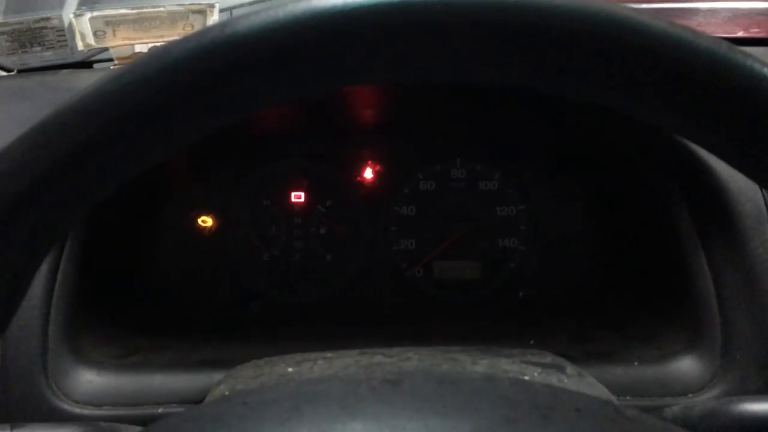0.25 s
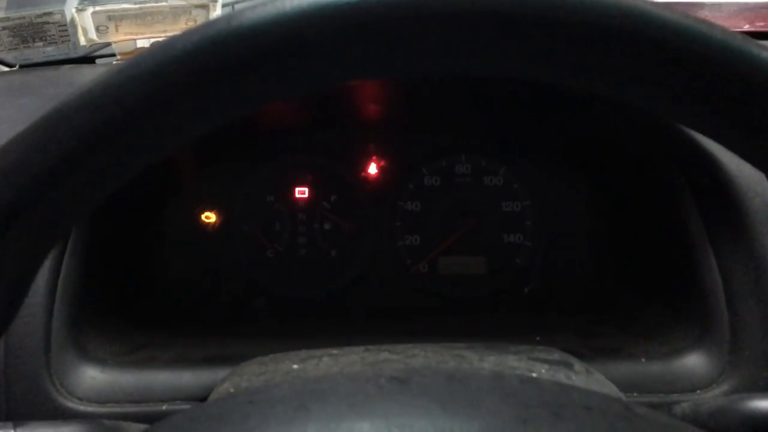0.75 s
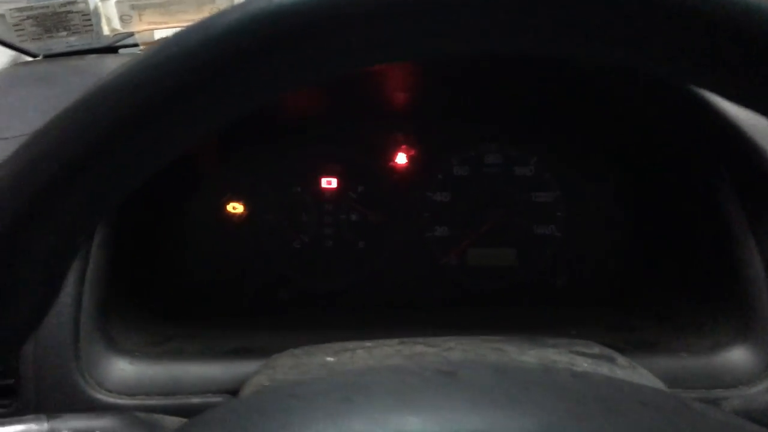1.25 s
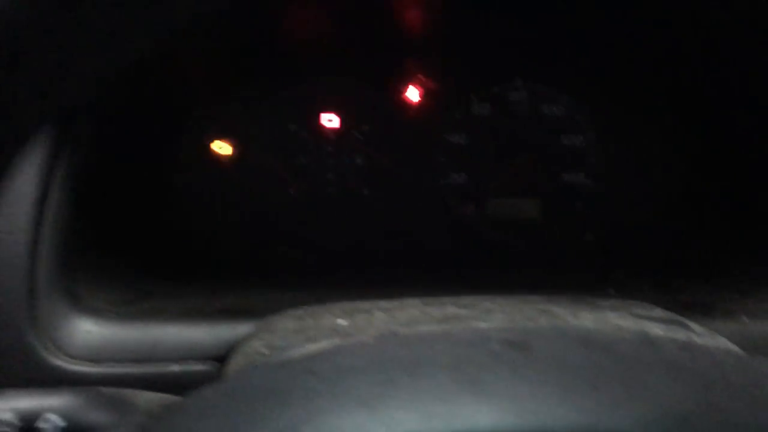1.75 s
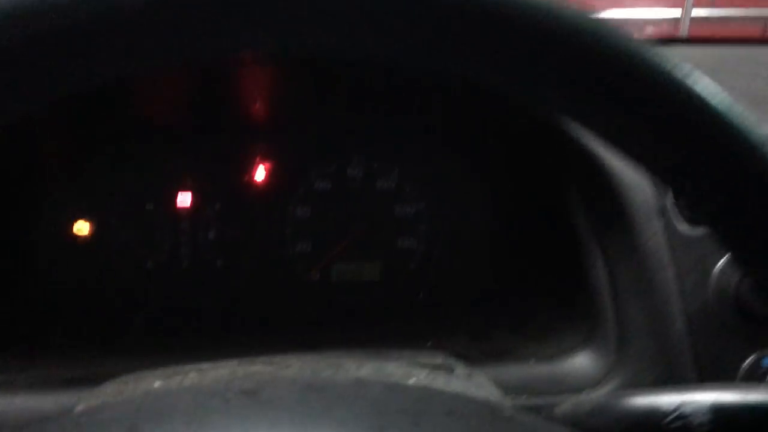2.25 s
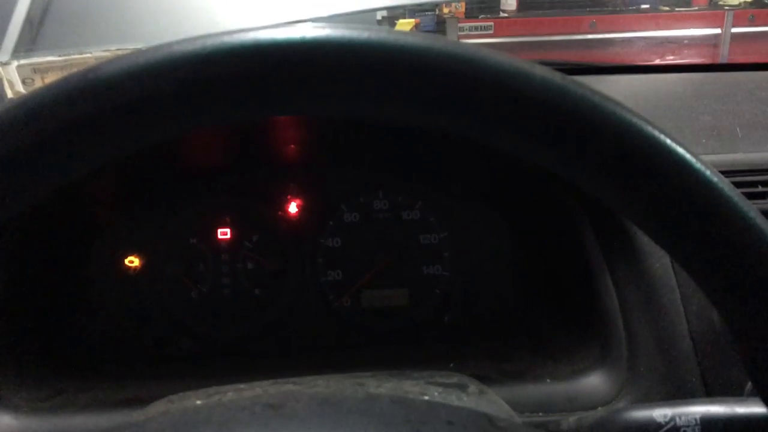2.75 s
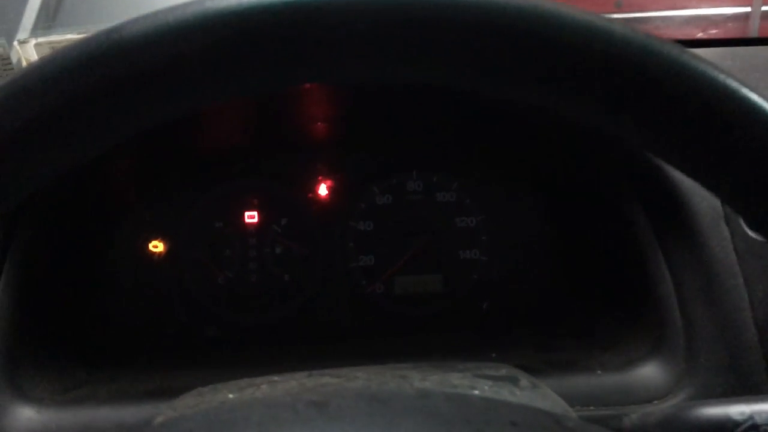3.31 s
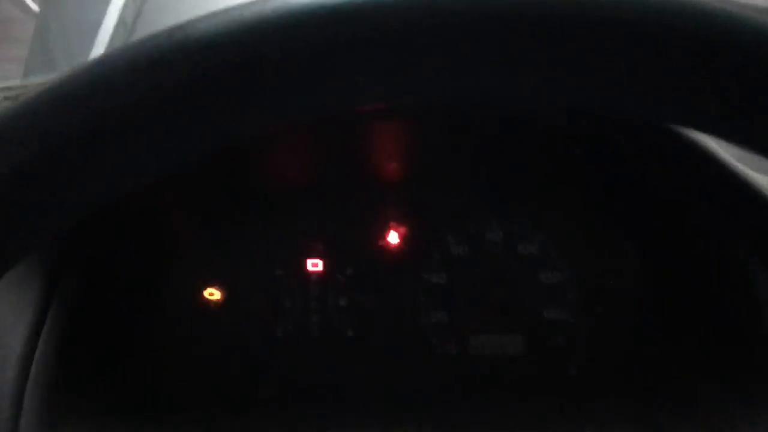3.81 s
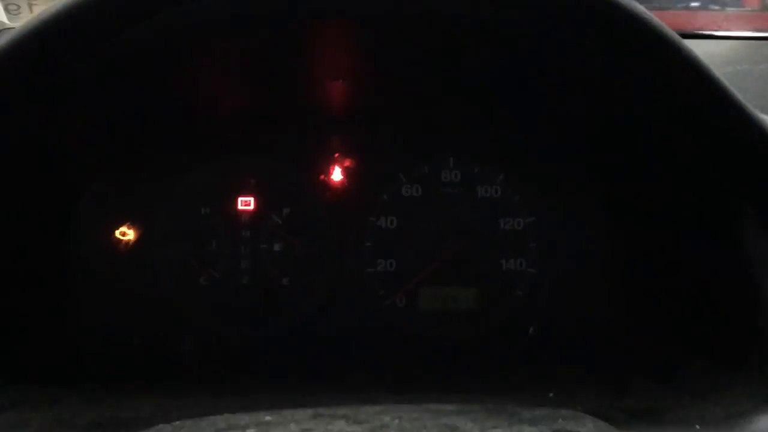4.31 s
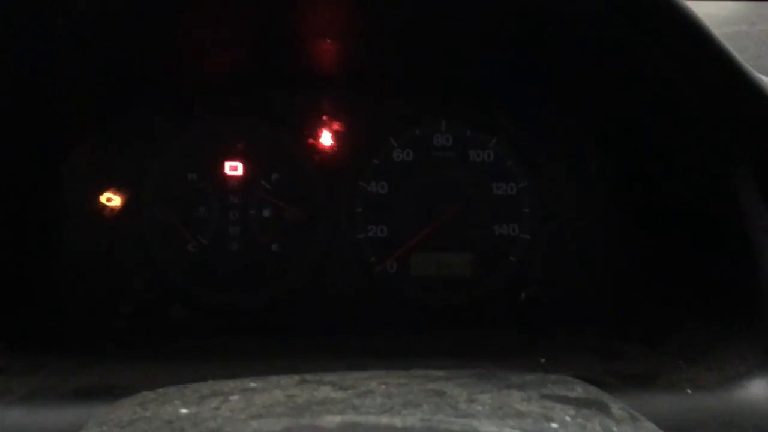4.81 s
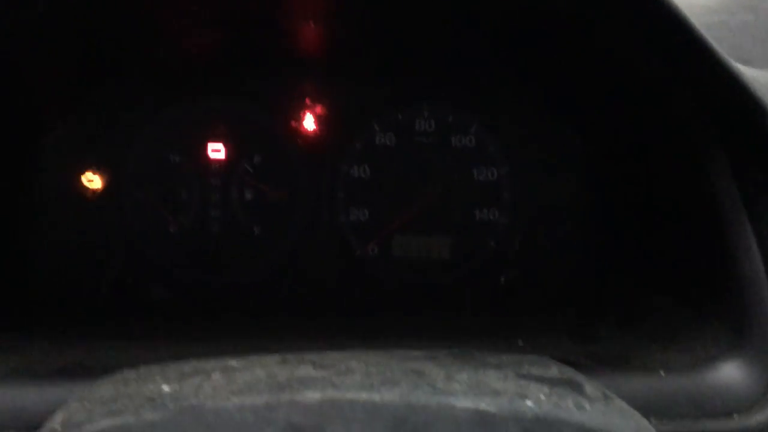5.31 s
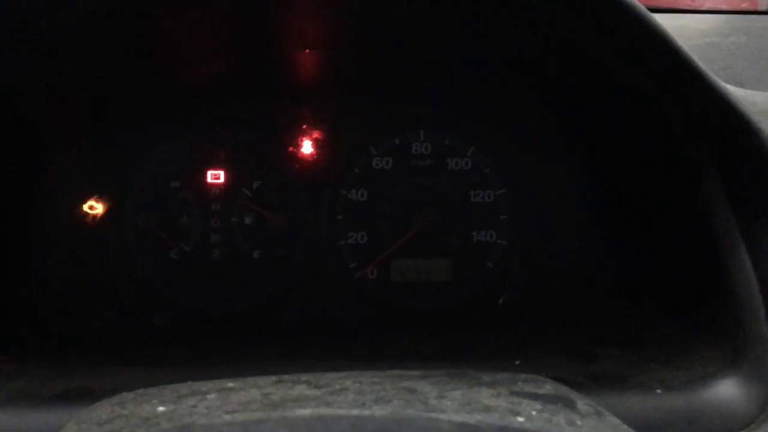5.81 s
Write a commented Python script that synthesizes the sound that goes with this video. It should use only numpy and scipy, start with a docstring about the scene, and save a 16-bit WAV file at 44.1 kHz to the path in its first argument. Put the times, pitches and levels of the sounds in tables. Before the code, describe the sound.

Inside a parked car, a four-cylinder engine idles unevenly with a low throb, buzzing panels, rattling metal and thin hiss, slowing very slightly.

```python
"""Repair shop, driver's seat of a small four-cylinder car: the engine idles roughly, its speed hunting.
Each firing thumps through the body shell as a sum of sines and sets dash panels buzzing near resonance.
A loose shield and the valve gear rattle as trains of contacts ringing in metal; air hisses as coloured noise.
Belt-driven parts hum and whine at multiples of the firing rate, over a low rumble of noise.
The hand-held microphone swings towards the dash twice, changing the balance of the sources."""
import sys
import numpy as np
from scipy import signal
from scipy.fft import rfft, irfft, next_fast_len
from scipy.io import wavfile

SR = 44100
rng = np.random.default_rng(int(sys.argv[2]) if len(sys.argv) > 2 else 0)


def persist_wave(psi):
    """Save psi, clipped to +-1, as 16-bit WAV."""
    counts = np.round(np.clip(psi, -1, 1) * 32767).astype(np.int16)
    wavfile.write(sys.argv[1], SR, np.atleast_2d(counts).T)


N = 267246  # samples
TIME = np.arange(N) / SR  # s

# ringing covers and brackets of the engine bay: centre_hz, width_hz, lift_db
BAY_RESONANCES = [(1610, 50, 4.5), (2713, 24, 10), (3230, 126, 6), (4360, 130, 3), (4580, 100, 5),
                  (4780, 71, 3), (12400, 440, 4.5)]


def from_db(db):
    """Decibels to gain."""
    return 10 ** (np.asarray(db) / 20)


def rms_one(x):
    """Scale to unit power."""
    return x / np.sqrt(np.mean(x ** 2) + 1e-20)


def in_time(rows):
    """Each column of a curve table, interpolated at every sample."""
    s, *columns = np.transpose(rows)
    return [np.interp(TIME, s, column) for column in columns]


def drift(rate_hz):
    """Slow chance of spread 1: noise through a double one-pole low-pass, drawn every 40 samples."""
    step, settling = 40, 2000
    pole = np.exp(-2 * np.pi * step * abs(rate_hz) / SR)
    noise = rng.standard_normal(N // step + settling + 2)
    slow = signal.lfilter([1], [1, -2 * pole, pole * pole], noise)[settling:]
    return np.interp(np.arange(N) / step, np.arange(len(slow)), rms_one(slow))


def coloured(x, spectrum, modes=()):
    """Pass a sound through a broad colour with resonances on top; rms 1."""
    size = next_fast_len(N)
    hz = np.maximum(np.arange(size // 2 + 1) * SR / size, 1)
    points = np.array(spectrum)
    db = np.interp(np.log(hz), np.log(points[:, 0]), points[:, 1])
    for centre_hz, width_hz, lift_db in modes:
        db = db + lift_db / (1 + (2 * (hz - centre_hz) / width_hz) ** 2)
    return rms_one(irfft(rfft(x, size) * from_db(db), size)[:N])


def tone(cycles):
    """A sine of rms 1 that peaks at every whole cycle."""
    return np.sqrt(2) * np.cos(2 * np.pi * cycles)


def orders(firings, rows, waver_db, slip, hunting):
    """Tones tied to the crank, swelling or fading with time; speed jitter blurs the high ones most."""
    out = 0
    for order, first_db, last_db in rows:
        db = np.linspace(first_db, last_db, N) + waver_db * drift(5.5)
        jittered = firings + hunting * drift(8.4)
        cycles = order * jittered + rng.random() + slip * drift(2.2)
        out = out + from_db(db) * tone(cycles)
    return out


def strike_train(firings, count, pattern_db, chance_db, scatter_s):
    """So many contacts a firing, recurring every four firings, each at its own crank angle and strength."""
    per_cycle = 4 * count
    cycles = np.arange(int(firings[-1] / 4) + 1)[:, None]
    places = (np.arange(per_cycle) + rng.random(per_cycle)) / per_cycle
    angles = 4 * (cycles + places)
    when = np.interp(angles, firings, TIME, left=-1, right=-1)
    when = when + scatter_s * rng.standard_normal(angles.shape)
    # a fixed pattern per engine cycle, plus chance at every contact
    pattern = pattern_db * rng.standard_normal(per_cycle)
    sizes = from_db(pattern + chance_db * rng.standard_normal(angles.shape))
    sizes = sizes * rng.choice([-1, 1], per_cycle)
    heard = (when >= 0) & (when < TIME[-1])
    return np.bincount((when[heard] * SR).astype(int), sizes[heard], N)


def thump(firings, sag, reach):
    """One rounded pressure pulse per firing, uneven in strength and timing, harder as the engine labours."""
    # harmonics of the pressure pulse: multiple_of_firing_rate, relative_db
    pulse_harmonics = [(1, 0), (2, -6.5), (3, -10)]
    idle_db, sag_db, swing_db = -32, 5, 1.0  # at nominal idle; per firing/s lost; at full reach
    uneven_db, uneven_firings = 0.42, .004
    angle = firings + uneven_firings * drift(16)
    pulse = sum(from_db(db) * tone(round(order) * angle) for order, db in pulse_harmonics)
    return pulse * from_db(uneven_db * drift(13) + idle_db + sag_db * sag + swing_db * reach)


def panels(firings, speed, flutter_db=0.5):
    """Dash panels answer half a firing late, loudest when an engine order meets their resonance."""
    # buzzing dash panels: multiple_of_firing_rate, resonance_hz, width_hz, level_on_resonance_db
    panel_resonances = [(7, 291.8, 6.9, -50), (8, 330.8, 2.8, -52.0)]
    buzz = 0
    for order, hz, width_hz, db in panel_resonances:
        detuning = 2 * (round(order) * speed - hz) / width_hz
        response = from_db(db) / (1 + .5 * detuning ** 2)
        buzz = buzz + response * tone(round(order) * (firings - .5))
    return buzz * from_db(flutter_db * drift(5.4))


def body_shell(firings):
    """Unequal cylinders shake the shell at many faint wavering orders, locked to quarters of the firing rate."""
    # weaker body vibration: multiple_of_firing_rate (before rounding to quarters), first_db, last_db
    shell_orders = [(4, -61, -73), (4.5, -69, -75), (4.75, -62, -60), (5, -61.5, -57.5), (5.25, -64.5, -67),
                    (7.5, -65, -77), (9.5, -60.5, -67.5), (10, -64.5, -70), (12, -62, -66),
                    (12.5, -68, -65.5), (14, -61, -74), (18.25, -74, -62), (21.85, -63.5, -65.5)]
    locked = [(np.round(4 * order) / 4, first_db, last_db) for order, first_db, last_db in shell_orders]
    return orders(firings, locked, waver_db=2.0, slip=0.035, hunting=0.002)


def shield(firings, reach, swing_db=2):
    """Thin loose sheet metal chatters under the firings and rings in a few narrow modes."""
    # buzz of the shield before the swings, mostly weaker as the engine slows: time_s, level_db
    shield_level = [(0, -50.5), (0.7, -54), (1.5, -53.5), (2.1, -53), (3, -53), (4, -57), (5, -75),
                    (6.06, -64)]
    # ringing of the sheet: centre_hz, width_hz, relative_db
    sheet_modes = [(1316, 43, -4), (1470, 150, 1.5), (2328, 95, -0.5)]
    out = 0
    for hz, width_hz, db in sheet_modes:
        chatter = strike_train(firings, count=6, pattern_db=2.0, chance_db=-2.5, scatter_s=.0004)
        ringing = signal.lfilter(*signal.iirpeak(hz, hz / width_hz, fs=SR), chatter + 1e-18)
        out = out + from_db(db) * rms_one(ringing)
    return from_db(in_time(shield_level)[0] + swing_db * reach) * rms_one(out)


def valve_gear(firings, ring_t60_s=.1, rub_db=-2.0, surge_db=0.5, pulsing=0.042):
    """Tappets and injectors tick into the dense ringing of the engine bay, over the rub of sliding parts."""
    # colour of the clatter: frequency_hz, relative_db
    clatter_colour = [(300, -10.5), (500, -11), (700, -10.5), (900, -7), (1150, -3.5), (1400, -4),
                      (1600, -4), (1800, -2.5), (2020, -2.5), (2220, -6.5), (2400, -8.5), (2700, -13.5),
                      (4500, -19), (7000, -30)]
    age_s = TIME[:SR // 4]
    ticks = 0
    for part in range(4):
        train = strike_train(firings, count=2, pattern_db=1.5, chance_db=3.0, scatter_s=.0002)
        ringing = rng.standard_normal(len(age_s)) * from_db(-60 * age_s / ring_t60_s)
        ticks = ticks + signal.fftconvolve(train, ringing)[:N]
    noise = rms_one(ticks) + from_db(rub_db) * rng.standard_normal(N)
    strokes = 1 + pulsing * tone(2 * firings)  # one intake and one exhaust valve shut per firing
    return coloured(noise * strokes, clatter_colour, BAY_RESONANCES) * from_db(surge_db * drift(9.1))


def air(firings, pulsing=0.017, flicker_db=0.48):
    """Intake and fan hiss: noise swelling a little with each firing."""
    # colour of the hiss: frequency_hz, relative_db
    hiss_colour = [(1500, -20), (2900, -10.5), (3900, 1), (4950, -5.5), (5500, -3.5), (6450, -4),
                   (6850, -8), (7550, -10.5), (8100, -7.5), (9800, -11), (10450, -19), (11000, -14),
                   (13500, -14.5), (16000, -16)]
    strokes = 1 + pulsing * tone(firings)
    flow = rng.standard_normal(N) * strokes * from_db(flicker_db * drift(28))
    return coloured(flow, hiss_colour, BAY_RESONANCES)


def whines(firings, sag, reach):
    """Belt-driven parts and a ringing bracket sing far above the firing rate; every firing jerks their pitch."""
    # belt teeth, a ringing bracket and the alternator: multiple_of_firing_rate, level_db, # sag_db (per
    # firing/s lost), swing_db (at full reach), jerk_cycles, wander_cycles, wander_rate_hz, # flutter_db,
    # flutter_rate_hz
    whine_parts = [(27.97, -52.5, 2.5, -12.5, 0.036, 0.074, 20, 2.5, 26),
                   (38.06, -64.5, -6, 10, 0.027, 0.05, 7, 2.5, 14),
                   (122, -62.0, -5.5, 4.5, 0.098, 0.16, 8.5, 3.5, 44)]
    out, jerk = 0, np.sin(2 * np.pi * firings)
    for order, db, sag_db, swing_db, ripple, wander, wander_hz, flutter_db, flutter_hz in whine_parts:
        cycles = order * firings + ripple * jerk + wander * drift(wander_hz)
        song = tone(cycles) * from_db(flutter_db * drift(flutter_hz))
        out = out + from_db(db + sag_db * sag + swing_db * reach) * rms_one(song)
    return out


def belt(firings):
    """Pulleys and bearings hum between the engine orders, wandering as the belt creeps."""
    # pulleys and bearings on the belt: multiple_of_firing_rate, first_db, last_db
    pulley_orders = [(3.29, -55, -59), (6.603, -56.5, -62), (24.35, -62, -66), (36.66, -58, -73),
                     (38.97, -63, -61.5), (39.6, -67, -68), (42.1, -59, -63.5), (55.3, -56.5, -79),
                     (60.63, -62.5, -63.5)]
    return orders(firings, pulley_orders, waver_db=3.0, slip=0.1, hunting=0.0028)


def rumble(level_db=-47.0):
    """Uneven combustion leaves low noise under the orders."""
    # colour of the rumble: frequency_hz, relative_db
    rumble_colour = [(12, -22), (30, 6), (55, -1), (90, -1.5), (135, -6.5), (175, -10), (205, -5.5),
                     (240, -11.5), (290, -9), (350, -9), (440, -19.5), (700, -21), (1100, -50)]
    return from_db(level_db) * coloured(rng.standard_normal(N), rumble_colour)


def swing():
    """How far the microphone has swung towards the dash: a smooth out and back each time."""
    # swings, passing a quiet spot of the belt whine: centre_s, half_length_s, reach (0 to 1)
    dash_swings = [(1.85, 0.49, 0.83), (4.03, 0.29, 0.8)]
    return sum(reach * np.exp(-((TIME - s) / half_s) ** 2) for s, half_s, reach in dash_swings)


def scene():
    """Count the firings from the hunting speed, then sum every source at the microphone."""
    # the idle hunts and slowly sags: time_s, firings_per_s
    idle_speed = [(0.0, 41.75), (0.7, 41.91), (1.1, 41.58), (1.55, 41.6), (1.85, 41.84), (2.35, 41.75),
                  (2.9, 41.73), (3.2, 41.51), (3.85, 41.48), (4.4, 41.61), (4.8, 41.26), (5.45, 41.34),
                  (6.06, 41.24)]
    # engine bay through the bulkhead: time_s, valve_clatter_db, air_hiss_db
    bay_levels = [(0, -45.5, -51.6), (1.4, -44, -52), (2.2, -46, -53), (3.6, -45.5, -52), (4.9, -46, -53.5),
                  (6.06, -46.5, -54)]
    start_firings, nominal_idle = .166, 41.6  # phase in firings; firings per s
    speed, = in_time(idle_speed)
    firings = start_firings + np.cumsum(speed) / SR
    sag = nominal_idle - speed
    reach = swing()
    clatter_db, hiss_db = in_time(bay_levels)
    body = thump(firings, sag, reach) + panels(firings, speed) + body_shell(firings)
    bay = from_db(clatter_db) * valve_gear(firings) + from_db(hiss_db) * air(firings)
    belt_drive = whines(firings, sag, reach) + belt(firings)
    return (body + shield(firings, reach) + bay + belt_drive + rumble())[None]


def record(dry):
    """The top is cut steeply by a linear-phase low-pass."""
    cutoff_hz = 15750
    low_pass = signal.firwin(801, cutoff_hz, fs=SR, window="blackmanharris")
    return signal.fftconvolve(dry, low_pass[None], "same", axes=1)


dry = scene()
out = record(dry)
persist_wave(out)
```